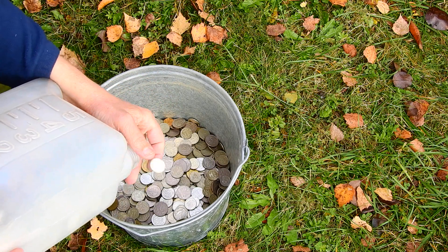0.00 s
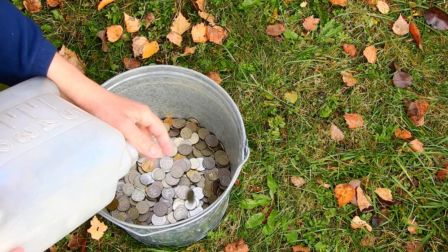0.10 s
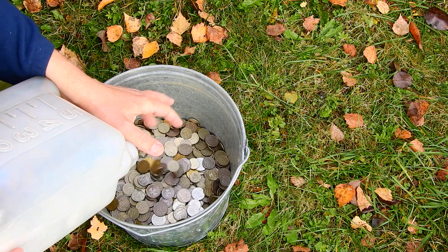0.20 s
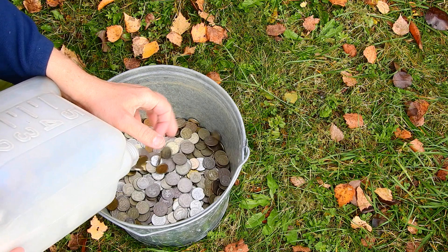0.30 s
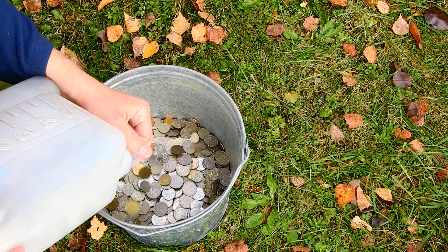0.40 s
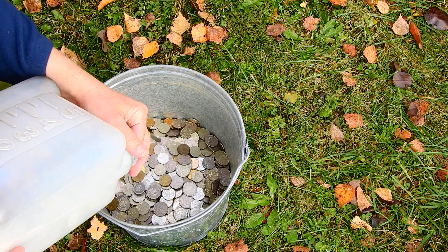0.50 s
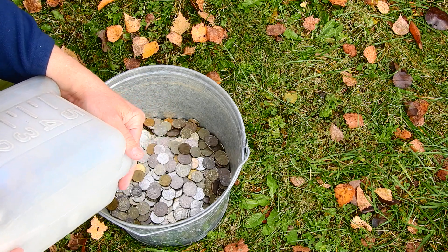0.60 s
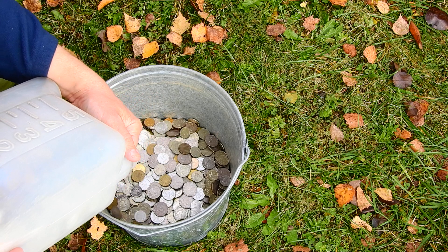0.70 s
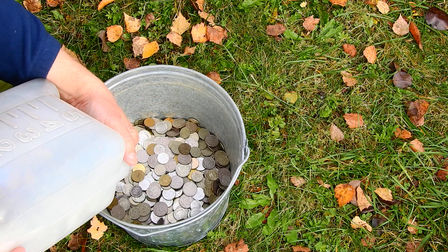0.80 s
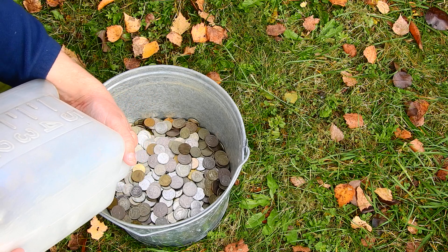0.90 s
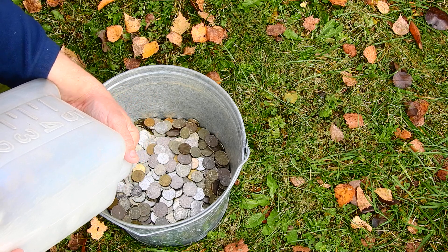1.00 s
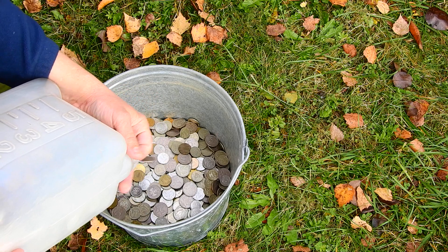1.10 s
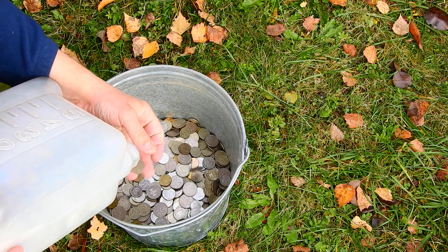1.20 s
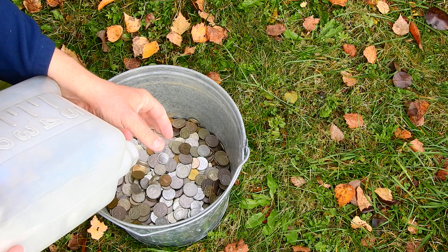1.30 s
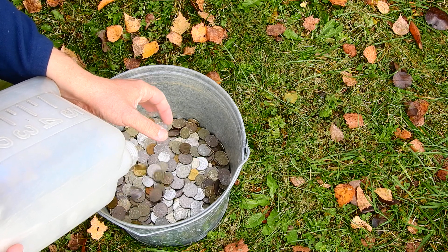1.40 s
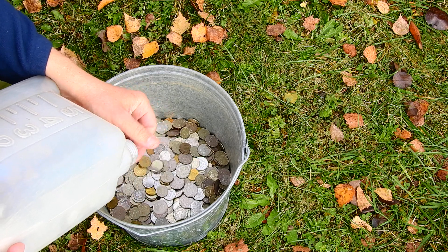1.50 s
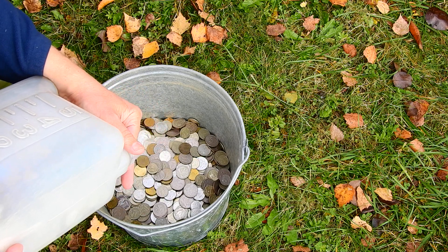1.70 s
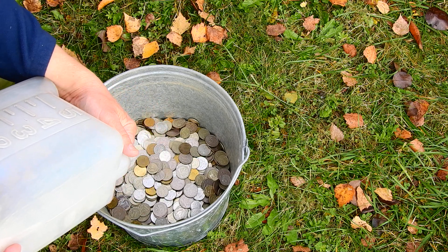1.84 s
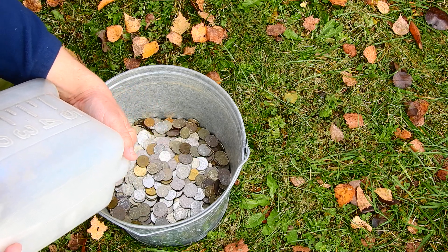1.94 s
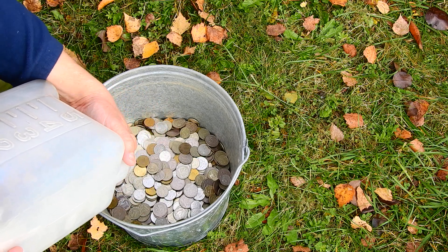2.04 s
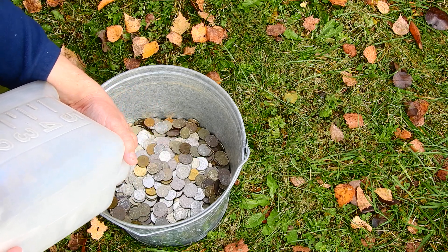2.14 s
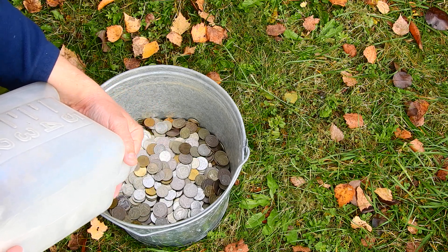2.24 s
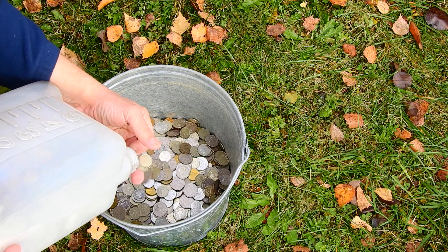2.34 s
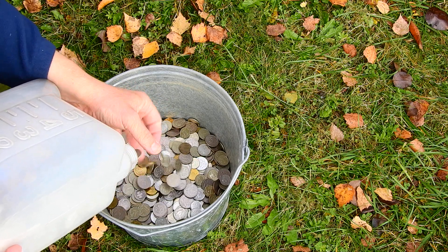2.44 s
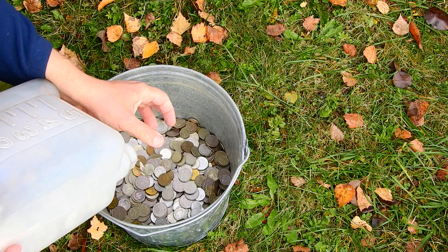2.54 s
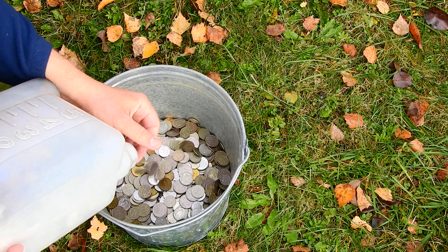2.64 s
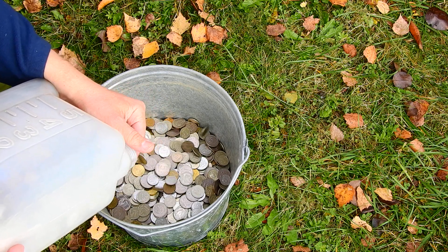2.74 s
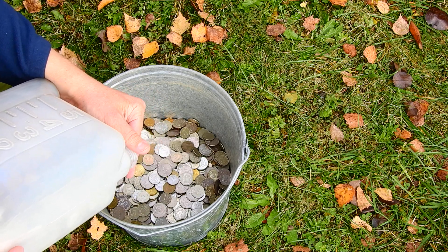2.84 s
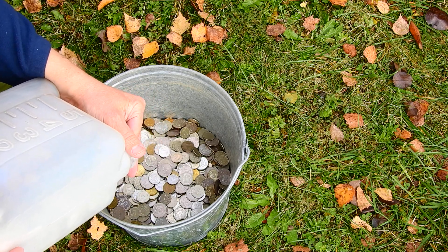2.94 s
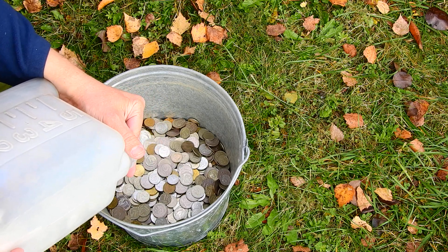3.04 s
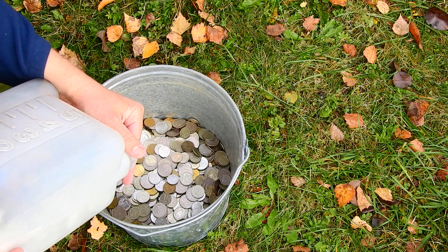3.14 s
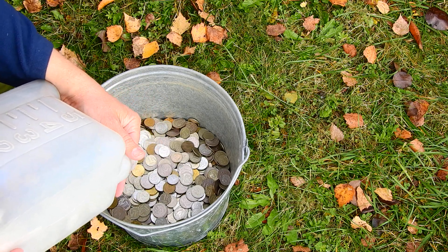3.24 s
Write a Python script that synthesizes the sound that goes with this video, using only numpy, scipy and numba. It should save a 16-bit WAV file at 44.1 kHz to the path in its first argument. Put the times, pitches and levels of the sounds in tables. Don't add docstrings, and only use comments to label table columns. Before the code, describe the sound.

Bright metallic coin clatter falls into a half-full pail with soft low thumps, plastic knocks and raking between handfuls, thinning around two seconds before another pour; outdoors, close small camera, slightly left of centre.

```python
import sys
import numpy as np
from scipy import signal
from scipy.fft import rfft, irfft
from scipy.io import wavfile
from scipy.ndimage import uniform_filter1d
from numba import njit

SR = 44100
rng = np.random.default_rng(int(sys.argv[2]) if len(sys.argv) > 2 else 0)


def to_linear_factor(level_db):
    exponent = np.asarray(level_db, float) / 20
    return 10 ** exponent


def wav_out(sig):
    wavfile.write(sys.argv[1], SR, np.round(np.clip(np.atleast_2d(sig).T, -1, 1) * 32767).astype(np.int16))


N = 143325
TREBLE_LAG_S = 0.0098


def level(x):
    return x / np.sqrt(np.mean(x ** 2))


def colour(x, points):
    hz, db = np.array(points, float).T
    curve = np.interp(np.log(np.linspace(1, SR / 2, 2049)), np.log(hz), db)
    cepstrum = irfft(curve * np.log(10) / 20)
    cepstrum[1:2048] *= 2
    cepstrum[2049:] = 0
    response = irfft(np.exp(rfft(cepstrum)))[:2048]
    return signal.fftconvolve(x, response / np.sqrt(np.sum(response ** 2)))[:N]


def butter(x, order, hz, kind="low"):
    return signal.sosfilt(signal.butter(order, hz, kind, fs=SR, output="sos"), x)


def mode(x, hz, t60):
    pole = np.exp(2j * np.pi * hz / SR - np.log(1000) / (t60 * SR))
    return signal.lfilter([1], [1, -pole], x).imag


def walk(rate):
    k = int(SR / rate)
    held = np.repeat(rng.standard_normal(N // k + 1), k)
    return np.sqrt(2) * uniform_filter1d(uniform_filter1d(held, k), k)[:N]


def add(track, s, x):
    i = max(int(s * SR), 0)
    track[i:i + len(x)] += x[:N - i]


def contacts(rate, scatter_db, smear_s):
    chance, size = rng.random((2, N))
    strikes = (chance < rate / SR) * to_linear_factor(-scatter_db * np.log(1 - .99 * size))
    env = signal.lfilter([1], [1, -np.exp(-1 / (smear_s * SR))], strikes)
    return level(env * rng.standard_normal(N))


def hand(spans):
    rise_s, fall_s = 0.018, 0.011
    t, gain = np.arange(N) / SR, np.zeros(N)
    for start, end, db in spans:
        rise = np.minimum(t - start, 0) / rise_s * (start > 0)
        fall = np.maximum(t - end, 0) / fall_s
        gain += to_linear_factor(db) * np.exp(rise - fall)
    return gain


# (frequency [Hz], level [dB per Hz])
AIR_SPECTRUM = [(28, -12), (70, 0.5), (130, -6), (250, -9), (1500, -19.5), (5000, -21.5), (15000, -38)]
# (start [s], end [s], level [dB])
WIND_GUSTS = [
    (1.04, 1.16, 8.5),
    (2.25, 2.4, -1),
]


def air():
    mid, side = (level(colour(rng.standard_normal(N), AIR_SPECTRUM)) for _ in range(2))
    side, low = butter([side, mid], 2, 130)
    gust = to_linear_factor(3 * walk(4.6)) + hand(WIND_GUSTS)
    mid = mid + low * (gust - 1)
    left = mid + .9 * gust * side + .33 * low
    right = mid - .7 * gust * side - .33 * low
    bump = np.zeros(N)
    add(bump, 1.985, to_linear_factor(-32) * np.hanning(1200) * np.sin(2 * np.pi * 104 * np.arange(1200) / SR))
    return to_linear_factor(-50.5) * np.array([left, right]) + bump


# (start [s], end [s], level [dB])
FINGER_RAKES = [(0, .24, -32.5), (.26, .76, -35), (.76, .87, -42), (.87, 1.02, -34), (1.15, 1.265, -33.5),
                (1.345, 1.78, -40.5), (1.855, 2.03, -42.5), (2.07, 2.11, -31), (2.12, 2.2, -37),
                (2.21, 2.28, -51), (2.3, 2.38, -33.5), (2.39, 2.47, -33.5), (2.5, 2.98, -40.5)]
# (time [s], peak level [dB])
NECK_KNOCKS = [(0.159, -39), (0.2674, -15), (0.3666, -13.5), (0.4115, -27), (0.5319, -3), (0.593, -8),
               (0.6225, -11.5), (0.6836, -9), (0.9727, -12), (1.0497, -12.5), (1.0992, -5.5), (1.3228, -10),
               (1.8552, -22), (2.1529, -23.5), (2.1675, -14.5), (2.2928, -20), (2.4002, -13.5),
               (2.424, -21), (2.4512, -33), (2.4779, -15), (2.5486, -15), (2.6737, -14.5), (2.8502, -13),
               (3.055, -32.5)]
# (time [s], peak level [dB])
NECK_TAPS = [(0.0443, -12), (0.0583, -12), (0.1045, -15), (0.1634, -13), (0.1691, -17.5), (0.3002, -14),
             (0.3218, -16.5), (0.4686, -9), (0.7048, -11), (0.7422, -18), (0.916, -17), (0.9391, -16),
             (0.9854, -29), (1.2019, -13), (1.216, -19), (1.2486, -19), (1.316, -26), (1.3995, -15),
             (1.4741, -23.5), (1.4836, -24), (1.6345, -30), (1.6394, -17), (1.9183, -23.5), (2.021, -37),
             (2.0583, -19), (2.0923, -15.5), (2.124, -18), (2.2976, -14), (2.313, -17), (2.3446, -21),
             (2.4054, -7.5), (2.413, -15), (2.4315, -11), (2.4856, -16), (2.6006, -15.5), (2.757, -12),
             (3.237, -34)]
NECK_MODES = [1346, 1694]
# (frequency [Hz], level [dB per Hz])
PLASTIC_SPECTRUM = [(300, 3), (800, -3), (1500, -2), (3200, -1.5), (6500, -6), (10000, -18), (13000, -41)]


def canister():
    grain = contacts(600, 1.5, .001) + .4 * rng.standard_normal(N)
    scrape = hand(FINGER_RAKES) * to_linear_factor(1.5 * walk(60)) * grain
    out = scrape + sum(to_linear_factor(-27) * mode(scrape * (walk(40) > 0), hz, .015) for hz in NECK_MODES)
    out = butter(out, 2, 750, "high")
    t = np.arange(1500) / SR
    for s, db in NECK_KNOCKS:
        decay_s = 0.012 * to_linear_factor(0.35 * db)
        env = (1 - np.exp(-t / 0.00014)) * np.exp(-t / decay_s)
        add(out, s, to_linear_factor(db - 5.5) * rng.standard_normal(1500) * env)
    for s, db in NECK_TAPS:
        env = (1 - np.exp(-t / 0.00015)) * np.exp(-t / 0.0034)
        add(out, s, to_linear_factor(db - 4.5) * np.sign(rng.standard_normal(1500)) * env)
    return butter(colour(out, PLASTIC_SPECTRUM), 2, 500, "high")


# (time [s], peak level [dB])
BUCKET_THUMPS = [(0.059, -6), (0.221, 1.5), (0.267, 9.5), (0.299, 0.5), (0.342, 2), (0.366, 4),
                 (0.405, 3.5), (0.448, -2), (0.467, 6.5), (0.532, -27), (0.622, 1.5), (0.719, 0.5),
                 (0.908, -3.5), (1.324, 4.5), (1.397, 8), (1.437, -10), (1.473, -2), (1.55, -6),
                 (1.583, -7), (1.636, 3.5), (2.478, 1), (2.547, 4.5), (2.573, -0.5), (2.675, 6.5),
                 (2.707, -23), (2.755, 5), (2.813, -4), (2.898, -8.5), (2.931, -10.5)]
# (frequency [Hz], level [dB], t60 [s])
BUCKET_MODES = [(338.7, -7, 0.12), (382, -12.5, 0.074), (491, 0, 0.029), (533, -4.5, 0.04),
                (530, -32.5, 0.04)]


def bucket(flow):
    push = flow * to_linear_factor(-35.5) * rng.standard_normal(N)
    for s, db in BUCKET_THUMPS:
        shove = np.hanning(300) * rng.standard_normal(300) + (np.arange(300) < 30)
        add(push, s, to_linear_factor(db - 47.5) * shove)
    body = sum(to_linear_factor(db) * mode(push, hz, t60) for hz, db, t60 in BUCKET_MODES)
    return butter(body, 4, [250, 900], "band")


# (time [s], peak level [dB], t60 [s])
COIN_CLINKS = [(0.236, 0, 0.042), (0.277, 10.5, 0.011), (0.288, 7, 0.014), (0.3008, 1, 0.032),
               (0.307, 5, 0.036), (0.3245, 0, 0.033), (0.3339, 11, 0.031), (0.3478, 7.5, 0.034),
               (0.3713, 8.5, 0.018), (0.3777, 9, 0.016), (0.3908, 8.5, 0.022), (0.4016, -1, 0.0345),
               (0.4168, 7.5, 0.014), (0.4223, 21.5, 0.027), (0.458, 1.5, 0.046), (0.475, 5.5, 0.046),
               (0.495, -1.5, 0.075), (0.7099, 10, 0.019), (0.7283, 2.5, 0.053), (1.1107, 18.5, 0.035),
               (1.116, -36.5, 0.032), (1.334, 7.5, 0.053), (1.364, -3, 0.027), (1.4089, 8, 0.018),
               (1.4833, 2, 0.075), (1.4925, -7.5, 0.075), (1.506, -9, 0.075), (1.5166, 9, 0.025),
               (1.6455, -4.5, 0.025), (1.6476, 9, 0.031), (1.6581, 6.5, 0.016), (2.4876, 10, 0.045),
               (2.558, -7, 0.012), (2.582, 4, 0.04), (2.6029, 1, 0.059), (2.6137, -7, 0.018),
               (2.621, 3, 0.022), (2.6796, 6.5, 0.025), (2.6876, 9, 0.027), (2.7615, 0, 0.041),
               (2.777, 3.5, 0.025), (2.8131, 3, 0.036), (2.8234, -3.5, 0.034), (2.9102, 1.5, 0.043)]
# (time [s], peak level [dB])
COIN_TICKS = [(0.1742, -28), (0.2294, 1), (0.249, -4), (0.4512, -6), (0.5034, 1), (0.581, -12),
              (0.6787, -2), (0.719, 6.5), (0.7221, -8), (0.7539, -10), (0.7603, 3.5), (0.7982, -16),
              (0.836, -14), (0.841, -14), (0.899, -14), (0.9173, -3.5), (0.9254, -2.5), (0.9385, -6),
              (1.0037, -23), (1.009, -22), (1.0675, -22), (1.0787, -10), (1.124, -3), (1.131, 1),
              (1.2242, -14), (1.3413, 1), (1.349, -21), (1.3774, 1), (1.429, -11), (1.4467, -8),
              (1.452, -17), (1.5394, -3), (1.5725, 1), (1.7115, -14.5), (1.7673, -25), (1.8044, -21.5),
              (1.8665, -27.5), (1.9805, -37), (2.019, -33), (2.0999, -26), (2.16, -23), (2.3044, -35),
              (2.3383, -14.5), (2.4003, -12.5), (2.4188, -7), (2.5416, -6.5), (2.5746, -3), (2.66, -7),
              (2.6977, 9), (2.702, -1), (2.7712, -13), (2.8379, -2), (2.867, -13), (2.8688, -4),
              (2.88, -7.5), (2.9662, -8.5), (2.986, -18.5), (3.0731, -34)]
# (time [s], peak level [dB], t60
# [s])
FLAT_SLAPS = [(0.5439, 5, 0.065), (0.6042, 9.5, 0.027), (0.6343, 5.5, 0.037), (0.6953, 9, 0.036),
              (0.9505, -14, 0.023), (0.9968, 8, 0.014), (1.0623, 0, 0.037), (1.2156, -14.5, 0.04),
              (1.9698, -29.5, 0.024), (2.0324, -24, 0.016), (2.1793, -24, 0.014), (2.859, 4, 0.042),
              (2.9442, -4.5, 0.019)]
# (start [s], end [s])
DULL_SPANS = [
    (.55, .8),
    (.99, 1.3),
    (1.7, 1.82),
]
# (start [s], end [s], level [dB])
COIN_POURS = [(0, .21, -36), (.292, .42, -18.5), (.44, .76, -23), (.8, 1.02, -35), (1.12, 1.27, -33.5),
              (1.352, 1.69, -24), (1.7, 1.79, -31.5), (2.36, 2.48, -36.5), (2.492, 2.55, -25.5),
              (2.565, 2.65, -17.5), (2.67, 2.84, -19.5), (2.84, 2.99, -30)]
# (start [s], length [s], frequency [Hz], level [dB])
FLYING_RINGS = [(.061, .096, 10206, -44), (.444, .081, 8638, -31), (.551, .104, 14667, -43),
                (1.129, .049, 8692, -40), (1.335, .058, 14720, -41), (1.875, .052, 10168, -59),
                (2.35, .06, 10160, -49), (2.50, .05, 9670, -32), (2.514, .044, 8779, -28),
                (2.557, .08, 14700, -42), (2.868, .073, 9872, -36), (2.915, .1, 10141, -36)]
# (frequency [Hz], level [dB per Hz])
COIN_SPECTRUM = [(1500, -39), (3500, -24.5), (5000, -15.5), (6700, -2.5), (8000, -15), (9500, -23),
                 (12500, -29.5), (15500, -35)]
# (frequency [Hz], level [dB])
RINGING_MODES = [(8600, 8), (9600, 5), (10170, -4), (14800, -8)]


def landings():
    tick_t60_s = 0.019
    sharp, flat, t = np.zeros(N), np.zeros(N), np.arange(4000) / SR
    ticks = [(s, db, tick_t60_s) for s, db in COIN_TICKS]
    for s, db, t60 in COIN_CLINKS + ticks + FLAT_SLAPS:
        dull = t60 == tick_t60_s and any(a < s < b for a, b in DULL_SPANS)
        track = flat if dull or (s, db, t60) in FLAT_SLAPS else sharp
        settle = 0.8 * to_linear_factor(-60 * t / np.clip(t60, .005, .2))
        env = (1 - np.exp(-t / 0.00007)) * (np.exp(-t / 0.00083) + settle)
        add(track, s - TREBLE_LAG_S, to_linear_factor(db) * env)
    return sharp, flat


def coins():
    sharp, flat = landings()
    early = hand(COIN_POURS)[int(TREBLE_LAG_S * SR):]
    flow = np.append(early, np.zeros(N))[:N] * to_linear_factor(1.2 * walk(24.7))
    rattle = flow * contacts(1800, 2.2, .0012)
    chatter = 0.45 * np.sign(rng.standard_normal(N)) + 0.089 * contacts(820, 2.0, 0.00204)
    hits = to_linear_factor(-4) * sharp * chatter
    bright = np.clip(12 * flow, 0, 1)
    slaps = to_linear_factor(-2) * flat * np.sign(rng.standard_normal(N))
    dull = butter(slaps + (1 - bright) * rattle, 3, 8000)
    out = colour(hits + dull + bright * rattle, COIN_SPECTRUM)
    t = np.arange(1500) / SR
    tail = to_linear_factor(-38) * rng.standard_normal(1500) * np.exp(-t / .01)
    out = out + signal.fftconvolve(out, tail)[:N]
    out = butter(out, 2, 900, "high")
    for hz, db in RINGING_MODES:
        for detune in np.linspace(-.04, .04, 6) + .006 * rng.standard_normal(6):
            struck = (0.35 * hits + rattle) * (walk(60) > .3)
            out += to_linear_factor(db - 37.5) * mode(struck, hz * (1 + detune), .04)
    for s, length, hz, db in FLYING_RINGS:
        t = np.arange(int((length + 0.036) * SR)) / SR
        landing = to_linear_factor(-900 * np.maximum(t - length, 0))
        shape = to_linear_factor(-60 * t / .5) * np.clip(t / 0.0016, 0, 1) * landing
        beat = 1 + 0.39 * np.sin(2 * np.pi * 35 * t + hz)
        add(out, s - TREBLE_LAG_S, to_linear_factor(db + 9) * shape * beat * np.sin(2 * np.pi * hz * t))
    return out, flow


def scene():
    metal, flow = coins()
    plastic = canister()
    near = metal + plastic
    top = butter(near, 1, 6000, "high")
    reflection = np.roll(top, 461) * walk(44.67)
    side = to_linear_factor(-16) * butter(plastic, 2, 1900, "high")
    side = side + to_linear_factor(-11.5) * top - to_linear_factor(-16.5) * reflection
    return near + bucket(flow) + np.array([side, -side]) + air()


@njit
def follow(x, release):
    e, out = 0., np.empty(len(x))
    for i in range(len(x)):
        e = max(x[i], e * release)
        out[i] = e
    return out


def low_pass(x):
    return signal.sosfilt(signal.butter(12, 15620, fs=SR, output="sos"), x)


def record(dry):
    split_hz, limit_db, release_s = 3767, -1, 0.009
    low = signal.sosfiltfilt(signal.ellip(6, .1, 40, split_hz, fs=SR, output="sos"), dry)
    lag = int(TREBLE_LAG_S * SR)
    late_treble = np.pad(dry - low, ((0, 0), (lag, 0)), mode="reflect")[:, :N]
    x = low + late_treble
    peak = follow(np.abs(x).max(axis=0), np.exp(-1 / (release_s * SR)))
    gain = np.minimum(1, to_linear_factor(limit_db) / (peak + 1e-9)) ** .9
    gain = uniform_filter1d(gain, size=16)
    mix = np.clip(x * gain, -1, 1)
    return low_pass(mix)


dry = scene()
out = record(dry)
wav_out(out)
```